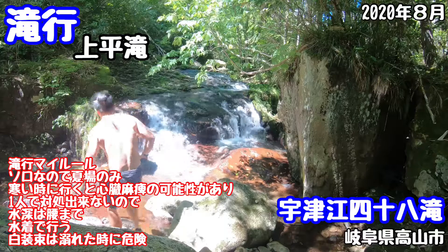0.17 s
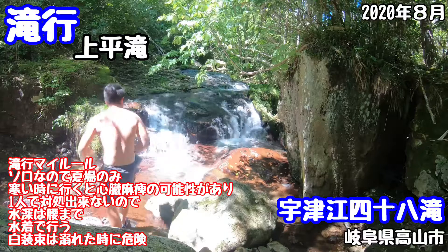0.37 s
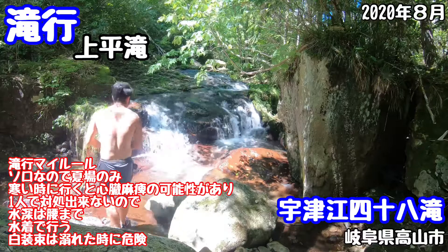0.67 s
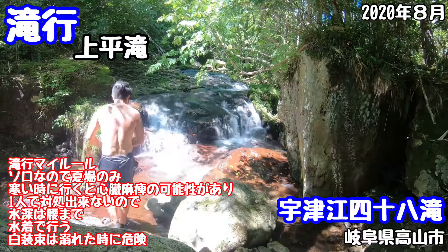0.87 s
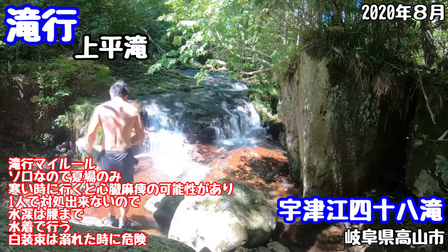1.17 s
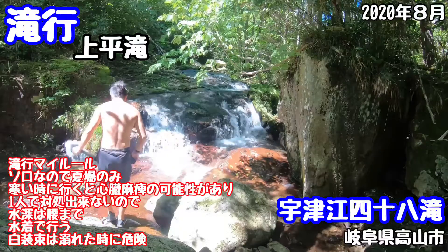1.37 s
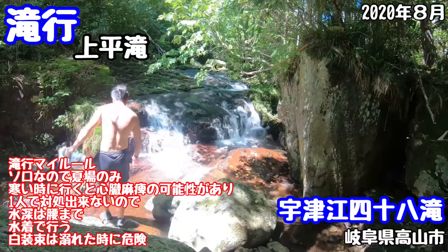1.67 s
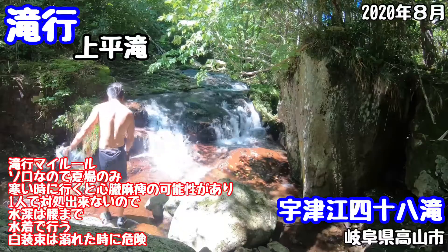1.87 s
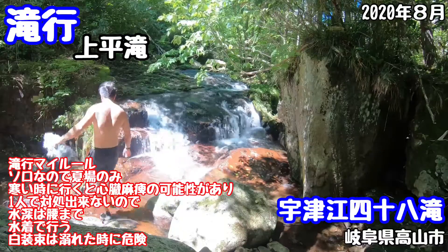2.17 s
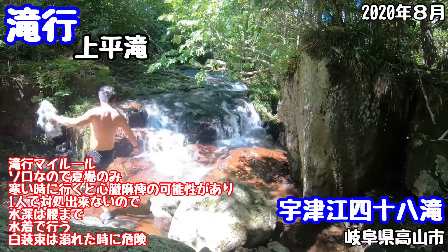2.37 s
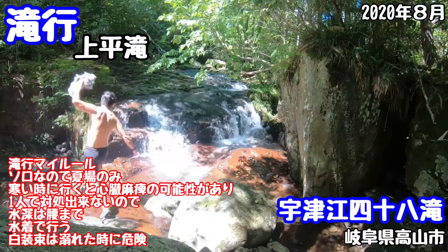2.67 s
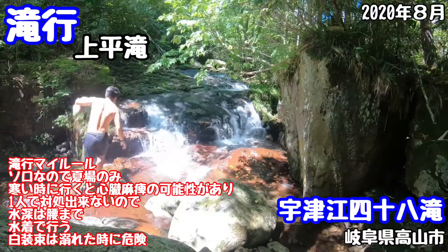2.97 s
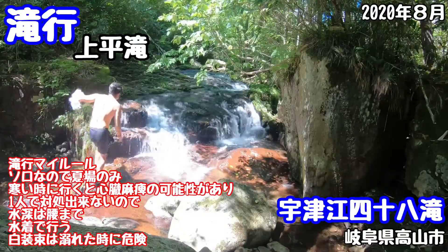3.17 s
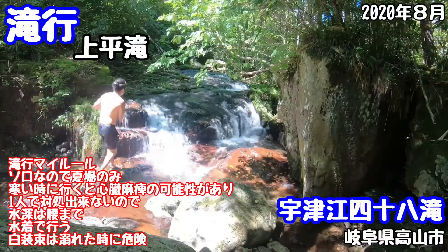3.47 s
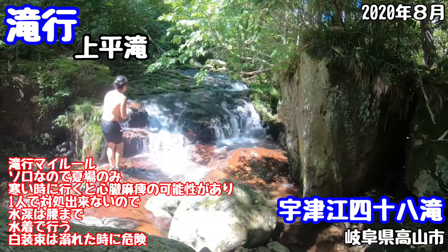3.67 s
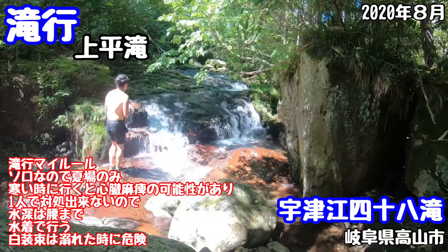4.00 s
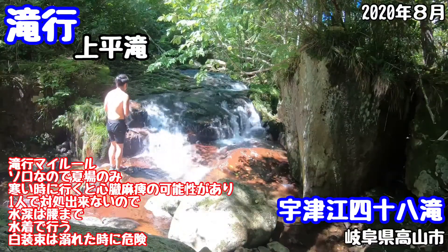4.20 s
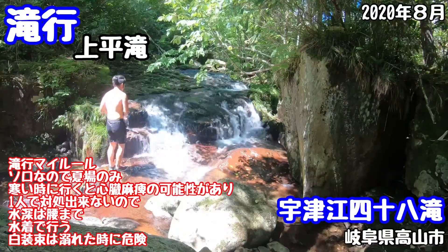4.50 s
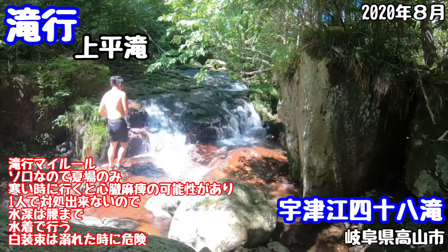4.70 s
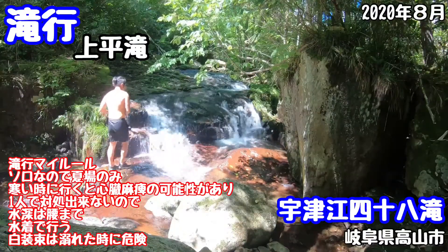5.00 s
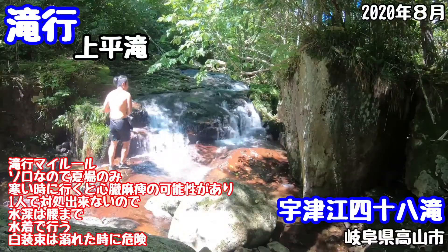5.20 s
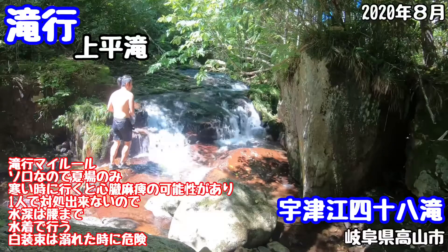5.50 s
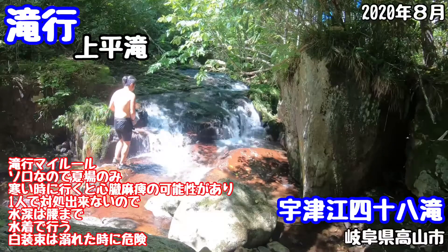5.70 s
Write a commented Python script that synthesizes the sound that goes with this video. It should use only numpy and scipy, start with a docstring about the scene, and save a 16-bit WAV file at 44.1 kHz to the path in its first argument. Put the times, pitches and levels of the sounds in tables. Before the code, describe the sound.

After a tiny silence, a small waterfall cuts in abruptly at full strength and runs steadily to the end. Bright spray hisses and patters, white water gurgles in the middle, and bubble clouds boom faintly below. Small slops and gulps come irregularly, with sharper splashes near three seconds. Outdoors among boulders, heard fairly close in stereo, with low and middle sound centred and the hiss wider.

```python
"""Small waterfall into a pool

A small waterfall pours steadily over rock ledges into a shallow pool, and cuts in just after the start.
Spray hisses and patters: noise plus thousands of short ringing sines, one for each drop or bubble.
White water gurgles below it in the same way, with deeper bubbles, and the rocks scatter the sound.
Lowest, shaped noise booms as clouds of bubbles; slops, splashes and gulps of air lift the level briefly."""
import sys
import numpy as np
from scipy import signal
from scipy.fft import rfft, irfft, next_fast_len
from scipy.io import wavfile
from scipy.ndimage import uniform_filter1d, map_coordinates

SR = 44100
rng = np.random.default_rng(int(sys.argv[2]) if len(sys.argv) > 2 else 0)


def transcribe(signal):
    """Save signal, clipped to [-1, 1], as a 16-bit WAV file at the path in sys.argv[1]."""
    frames = np.atleast_2d(signal).T
    limited = np.clip(frames, -1, 1)
    pcm = np.round(limited * 32767).astype(np.int16)
    wavfile.write(sys.argv[1], SR, pcm)


N = 257984  # length in samples

# three speeds at which the falling sheet of water wavers, in random points per second
GUSH_PER_S, RIPPLE_PER_S, FLUTTER_PER_S = 9, 26, 75


def amp(db):
    """Turns decibels into a gain."""
    return 10 ** (np.asarray(db) / 20)


def unit(x):
    """Scales a signal to an rms (average strength) of 1."""
    return x / np.sqrt(np.mean(x ** 2) + 1e-20)


def along(points, hz):
    """Reads a curve of (pitch, value) points, with straight lines between them on a log pitch axis."""
    point_hz, value = np.transpose(points)
    return np.interp(np.log(hz + 1), np.log(point_hz + 1), value)


def curves(rows):
    """Draws straight lines through each column after the time, giving one value per sample."""
    when_s, *columns = np.transpose(rows)
    t = np.arange(N) / SR
    return [np.interp(t, when_s, column) for column in columns]


def swells(rows, width_s):
    """Gives one lift in dB for each column after the time: every event is a smooth hump of equal width."""
    when_s, *lifts_db = np.transpose(rows)
    distance_s = np.arange(N) / SR - when_s[:, None]
    humps = np.exp(-(distance_s / width_s) ** 2)
    return np.array(lifts_db) @ humps


def wobble(rate):
    """Draws a smooth random curve through `rate` random points a second."""
    points = rng.standard_normal(int(N * rate / SR) + 4)
    return map_coordinates(points, [np.arange(N) * rate / SR])


def filtered(x, response):
    """Multiplies the spectrum of x by a gain that depends on frequency."""
    size = next_fast_len(N + SR // 2)
    gain = response(np.fft.rfftfreq(size, 1 / SR))
    return irfft(rfft(x, size) * gain, size)[..., :N]


def wash(patchy_db):
    """Makes mid and side noise for bubbles too many to tell apart, swelling in patches of time and pitch."""
    noise = signal.stft(rng.standard_normal((2, N)), nperseg=512)[2]
    patches = rng.standard_normal(noise.shape[1:])
    patches = uniform_filter1d(patches, size=7, axis=0)  # smooth over pitch
    patches = uniform_filter1d(patches, size=8, axis=1)  # smooth over time
    patchy = noise * amp(patchy_db * unit(patches))
    return unit(signal.istft(patchy, nperseg=512)[1][:, :N])


def bubbles(count, low_hz, high_hz, cycles, rise, spread_db, size):
    """Makes mid and side of a swarm of dying sines; each climbs in pitch as its bubble nears the surface."""
    when, pitch, life, strength, place = rng.random((count, 5)).T[:, :, None]
    hz = low_hz * (high_hz / low_hz) ** pitch
    t = np.arange(size) / SR
    age = t * hz / (cycles * (.5 + life))  # 1 when the ring has dropped by 60 dB
    gain = hz * amp(-spread_db * np.log(.02 + .98 * strength))  # a few are much louder than the rest
    climb = 1 + rise * np.minimum(age, 1) / 2
    ring = gain * amp(-60 * age) * np.sin(2 * np.pi * hz * t * climb)
    at = ((when * N).astype(int) + np.arange(size)).ravel()  # the samples where each ring lands
    mid = np.bincount(at, ring.ravel(), N)[:N]
    side = np.bincount(at, (ring * (2 * place - 1)).ravel(), N)[:N]
    return np.array([unit(mid), unit(side)])


def among_rocks(x, echo_db, t60):
    """Adds the scatter from the boulders; its paths change as the water lands in new places."""
    step = SR // 8
    t = np.arange(step) / SR
    pieces = np.pad(x, ((0, 0), (0, -N % step))).reshape(2, -1, step)
    # each piece gets its own fading noise tail; t60 is the time in s to fade by 60 dB
    tails = rng.standard_normal(pieces.shape) * amp(-60 * t / t60)
    rung = irfft(rfft(pieces, 2 * step) * rfft(tails, 2 * step))
    spill = np.roll(rung[..., step:], 1, axis=1)  # each tail runs on into the next piece
    echo = (rung[..., :step] + spill).reshape(2, -1)[:, :N]
    return unit(unit(x) + amp(echo_db) * unit(echo))


def heard(x, spectrum):
    """Colours a mid and side pair and spreads it to left and right, with a mid of rms 1."""
    # width of the sound: pitch_hz, side_minus_mid_db
    width = [(30, -3), (55, -6), (90, -20), (130, -18), (168, -16), (220, -22), (310, -16.5), (520, -19.5),
             (800, -7.5), (1200, -8.3), (2330, -12), (2430, -28), (2900, -50), (3450, -49), (3650, -32),
             (4580, -26), (4750, -8), (6500, -6.5), (9200, 0), (11000, -1.5)]

    def colour(hz):
        widths = np.array([np.ones_like(hz), amp(along(width, hz))])
        return amp(along(spectrum, hz)) * widths

    mid, side = filtered(x, colour)
    return np.array([mid + side, mid - side]) / np.std(mid)


def spray(flow_db):
    """Drops slap the pool and leave small ringing bubbles in the foam; the nearest patter on bare rock."""
    # colour of the spray and foam: pitch_hz, level_db
    spray_colour = [(150, -120), (900, -9.5), (1700, -5), (2300, -2.5), (3030, 0.5), (3300, -0.8),
                    (3550, -1.5), (3900, -4), (4900, -6.5), (5700, -9), (8200, -11), (9400, -14.5),
                    (10200, -22), (11000, -26), (11600, -38)]
    base_db, sway_db = -29, 0.07  # level before the flow and the lifts, swing from gush to gush
    patter_db = -17.5  # near drops on the rock, beside the noise of the foam
    fizz = bubbles(count=9000, low_hz=1699, high_hz=10600, cycles=39, rise=0.096, spread_db=2.5, size=400)
    slaps = bubbles(count=7000, low_hz=1510, high_hz=10100, cycles=1.9, rise=.05, spread_db=4.5, size=80)
    patter = bubbles(count=800, low_hz=1400, high_hz=3700, cycles=2.8, rise=.05, spread_db=0.5, size=130)
    drops = among_rocks(fizz + amp(-2.5) * slaps, echo_db=1.0, t60=0.14)
    foam = wash(patchy_db=0.2) + amp(-8) * drops + amp(patter_db) * patter
    level_db = base_db + flow_db + sway_db * wobble(GUSH_PER_S)
    return amp(level_db) * heard(foam, spray_colour)


def churn(flow_db):
    """Large bubbles gurgle in the white water on the ledges, over a wash of noise."""
    # colour of the white water: pitch_hz, level_db
    churn_colour = [(50, -120), (170, -35), (300, -8.5), (370, 0.9), (470, 0.3), (680, 0), (790, -1.2),
                    (880, 0.9), (970, -1), (1090, 0.5), (1300, -0.5), (1500, 0), (2000, -3.5), (2600, -6),
                    (4500, -50), (15000, -120)]
    base_db, sway_db = -31, 0.07  # level before the flow and the lifts, swing from gush to gush
    gurgle = bubbles(count=8000, low_hz=418.0, high_hz=2586, cycles=12.2, rise=0.14, spread_db=1.6, size=820)
    water = wash(patchy_db=0.15) + amp(-10.0) * among_rocks(gurgle, echo_db=-3.5, t60=0.14)
    level_db = base_db + flow_db + sway_db * wobble(GUSH_PER_S)
    return amp(level_db) * heard(water, churn_colour)


def plunge():
    """Air driven under the fall throbs as whole clouds of bubbles: noise whose deepest part comes and goes."""
    # colour of the bubble clouds under the fall: pitch_hz, level_db
    plunge_colour = [(12, -55), (26, -20), (42, -20.5), (65, -9.5), (91, -1.5), (105, -4.5), (130, -2),
                     (168, -9), (198, 1.4), (235, 0.8), (290, -3), (350, -6.5), (600, -41), (1500, -120)]
    # slow swell of the deepest boom: time_s, lift_db
    boom = [(0.4, -1), (1.2, 1), (2.0, -3), (3.3, -3.5), (4.4, -2), (5.0, 0.5), (5.6, -2)]
    base_db, sway_db = -43, 0.5  # level before the throb and the gulps, swing from gush to gush
    throb_per_s, throb_db = 21, 1.8  # the largest clouds come and go: random points per second, swing
    deep_hz = 133  # they ring below this pitch
    clouds = heard(unit(rng.standard_normal((2, N))), plunge_colour)
    deep = filtered(clouds, lambda hz: 1 / (1 + (hz / deep_hz) ** 8))
    boom_db, = curves(boom)
    throb = amp(boom_db) * unit(amp(throb_db * wobble(throb_per_s)))
    throbbing = clouds + (throb - 1) * deep  # only the deep part is made louder or softer
    return amp(base_db + sway_db * wobble(GUSH_PER_S)) * throbbing


def gulping(pool):
    """Each gulp of air makes the pool ring up briefly around the pitch of its bubble cloud."""
    # gulps of air dragged into the pool: time_s, pitch_hz, lift_db
    gulps = [(0.19, 80, 5), (0.29, 220, 3), (0.73, 500, 3.5), (0.77, 220, 3), (0.90, 220, 2),
             (0.95, 480, 4.5), (0.96, 95, 4.5), (0.98, 210, 4.5), (1.09, 90, 4), (1.65, 90, 5),
             (2.01, 230, 5), (2.17, 210, 4), (2.36, 500, 2.5), (2.43, 90, 7), (2.58, 90, 6), (2.71, 90, 6),
             (2.97, 45, 14), (3.16, 220, 4), (3.42, 480, 4), (3.46, 220, 3), (3.68, 105, 9), (4.01, 450, 3),
             (4.03, 100, 6), (4.11, 520, 2.5), (4.19, 90, 8), (4.36, 90, 4), (4.64, 90, 7),
             (4.66, 430, 2.5), (4.77, 220, 3.5), (4.82, 95, 7), (4.90, 95, 5), (4.98, 500, 2.5),
             (5.09, 90, 8), (5.61, 90, 6), (5.82, 220, 4)]
    gulp_s, gulp_octaves = 0.038, 0.64  # time to swell and to ebb, spread in pitch to either side
    when_s, pitch_hz, lift_db = np.transpose(gulps)
    hz, t, spectrum = signal.stft(pool, SR, nperseg=2048, noverlap=1536)
    octaves_off = np.log2((hz[:, None] + 1) / pitch_hz)
    in_pitch = np.exp(-(octaves_off / gulp_octaves) ** 2)
    in_time = np.exp(-((t - when_s[:, None]) / gulp_s) ** 2)
    lifted = spectrum * amp((lift_db * in_pitch) @ in_time)
    return signal.istft(lifted, SR, nperseg=2048, noverlap=1536)[1][:, :N]


def scene():
    """The flow is nearly steady; a shared uneven surge sways churn and spray, and single events lift them."""
    # slow drift of the flow over the ledges: time_s, level_db
    flow = [(0.2, -0.6), (1.05, -1), (1.7, -0.1), (2.0, 0.1), (3.3, 0.1), (4.3, 0), (4.8, 0.2),
            (5.25, -0.6), (5.8, 0.5)]
    # slops of water landing in the pool, and lulls (below 0): time_s, churn_lift_db, spray_lift_db, mist_lift_db
    slops = [(0.31, 1, 1, 0), (0.75, -0.5, 0.5, -0.3), (0.98, -0.5, 0.5, -0.5), (1.20, 0.8, 1.5, 0.2),
             (1.41, 2.5, 1.5, -0.5), (1.56, 1.6, 0, 0.6), (1.86, 1, 1, 1), (2.02, 1.8, 0.5, 0.6),
             (2.29, -1, 1.5, 1), (2.42, 0.5, 0.5, 0.2), (2.56, -1, 1, 0.5), (2.98, 0.3, -0.5, 1.1),
             (3.07, -0.5, 0.7, 0), (3.13, 0, 1.7, -0.5), (3.19, -1, -1.5, -0.5), (3.47, 1, 1.5, 0.5),
             (3.62, -1.5, -0.4, 0), (3.69, 3, 1, 0.8), (3.76, 0, 0, 0.2), (3.95, 0, -0.4, -0.5),
             (4.11, 1.7, -1.5, 0.8), (4.19, 1.5, 1.2, -0.3), (4.25, -1, -2, 0), (4.44, -0.2, -0.5, 0.8),
             (4.68, 0.5, 0.8, -0.5), (4.77, 0.3, 2, 0), (4.89, 0.5, 1.5, -1), (5.09, 3, 0, 0.5),
             (5.16, -1, -0.5, -0.3), (5.33, -0.3, 1, -0.5), (5.51, 1.5, 1.3, 0), (5.65, 1.5, 1.5, 0.2)]
    # sharp splashes off the ledge: time_s, spray_lift_db
    splashes = [(2.772, 3.5), (3.069, 1.8), (3.147, 4.5)]
    gush_share, flutter_share = 0.41, 0.94  # strength beside the ripple, the middle speed
    churn_surge_db, spray_surge_db = 0.14, 0.26  # swing that the shared surge gives each layer
    spray_follows = 0.21  # share of the slow drift that reaches the spray
    mist_hz = 3700  # the finest spray hisses above this pitch

    drift_db, = curves(flow)
    churn_lift_db, spray_lift_db, mist_lift_db = swells(slops, width_s=0.025)
    splash_db, = swells(splashes, width_s=0.009)
    gush = gush_share * wobble(GUSH_PER_S)
    flutter = flutter_share * wobble(FLUTTER_PER_S)
    surge = unit(gush + wobble(RIPPLE_PER_S) + flutter)

    drops = spray(spray_follows * drift_db + spray_surge_db * surge)
    coarse = filtered(drops, lambda hz: 1 / (1 + (hz / mist_hz) ** 12))
    mist = drops - coarse
    water = churn(drift_db + churn_lift_db + churn_surge_db * surge)
    pool = gulping(plunge() + water)
    return pool + amp(spray_lift_db + splash_db) * coarse + amp(mist_lift_db) * mist


def record(dry):
    """Left and right differ a little in colour; the sound cuts in and its highest treble is cut off."""
    # balance of the two sides: pitch_hz, left_minus_right_db
    lean = [(200, 0), (350, 1.2), (490, -0.1), (850, 1.9), (1200, 2.5), (1400, -1), (1550, 1), (1900, 1.3),
            (2700, 0), (4400, -0.3), (4900, 2.5), (5900, -1.2), (7100, 1.5), (8100, 3), (9600, -6.5),
            (10600, -2.6)]
    start_s, top_hz = 0.073, 11550  # silence before the cut-in, upper limit of the treble
    pair = filtered(dry, lambda hz: amp(np.outer([.5, -.5], along(lean, hz))))
    started = pair * (np.arange(N) / SR >= start_s)
    return filtered(started, lambda hz: 1 / np.sqrt(1 + (hz / top_hz) ** 160))


dry = scene()
out = record(dry)
transcribe(out)
```